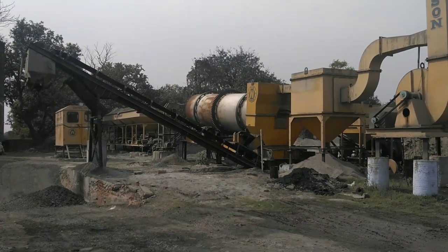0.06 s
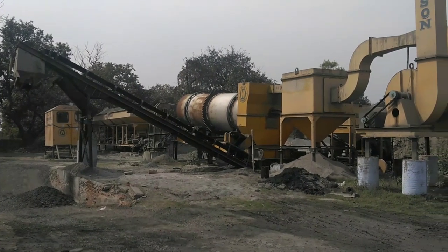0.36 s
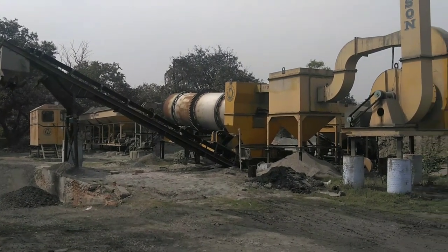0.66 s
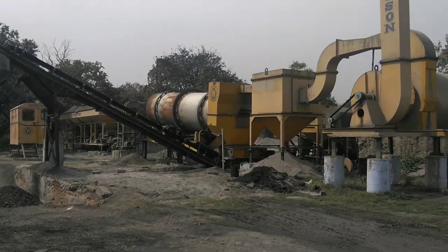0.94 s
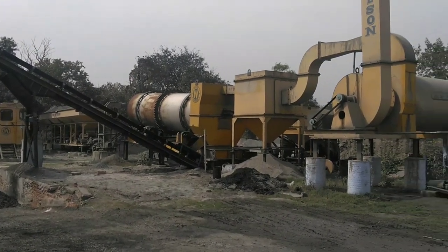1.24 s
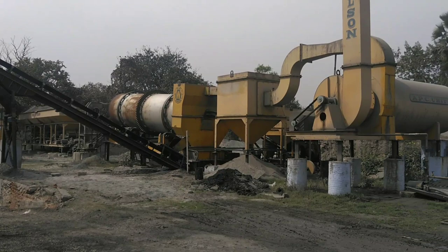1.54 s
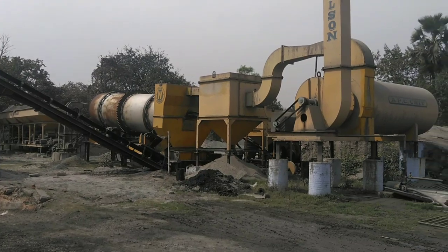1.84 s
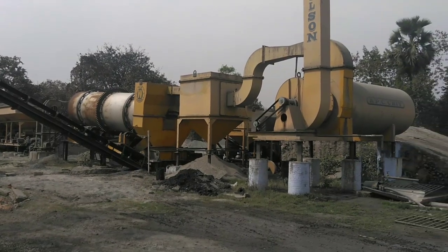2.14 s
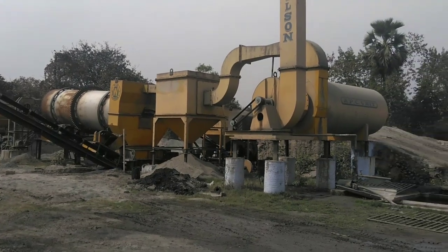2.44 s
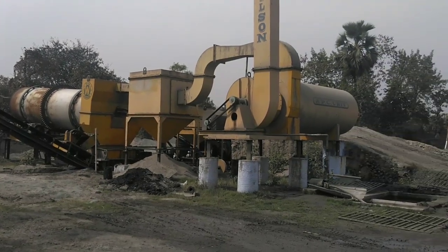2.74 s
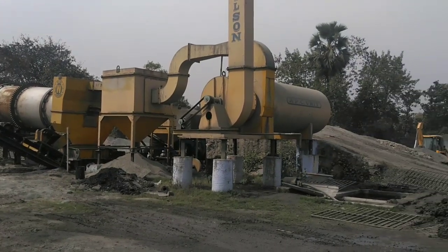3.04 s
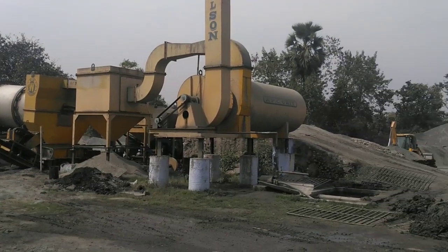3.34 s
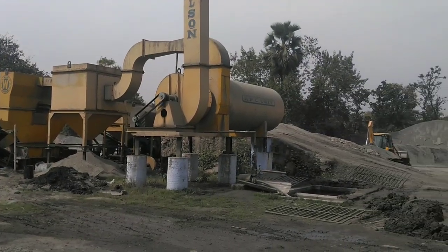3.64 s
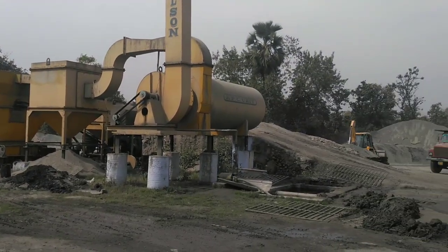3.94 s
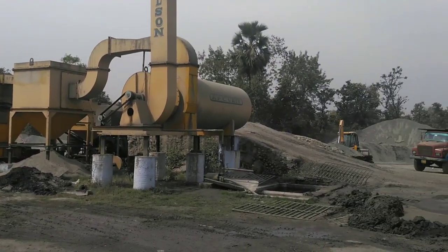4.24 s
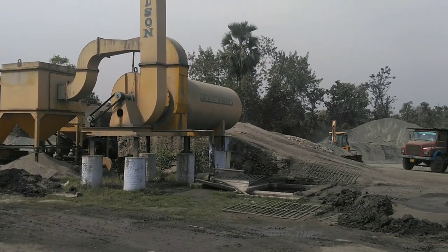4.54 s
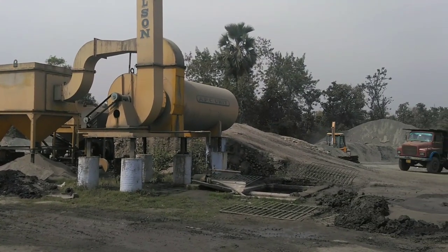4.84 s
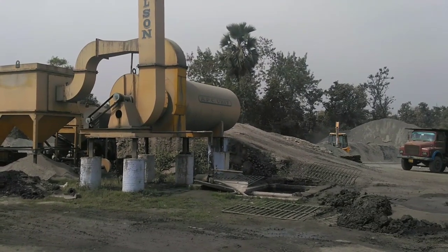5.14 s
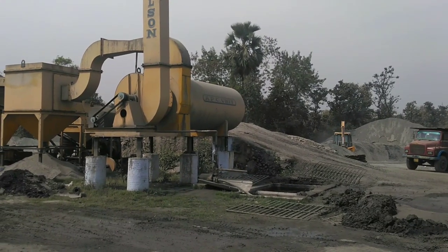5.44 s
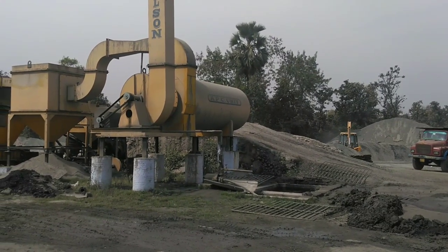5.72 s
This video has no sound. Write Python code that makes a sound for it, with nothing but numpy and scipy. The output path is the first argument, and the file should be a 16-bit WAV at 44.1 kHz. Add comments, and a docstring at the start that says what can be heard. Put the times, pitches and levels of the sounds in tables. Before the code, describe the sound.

A stone crusher works across an open yard, biting about five times a second. Each bite mixes cracking stone, a knock of steel plates and a dull thud. Loose lumps drop and stones snap in between, over a steady rumble and the hiss of sliding grit. A turning part rubs now and then, and a bearing squeaks faintly. The crackle shifts from left to right as the listener turns.

```python
"""A jaw crusher breaks stone, heard across an open yard by a listener who is turning. The jaw closes
about five times a second; each bite is a shower of impacts exciting resonances: cracking stone, a knock
of the plates, a dull thud of the heavy frame. Now and then a lump drops or a stone snaps or splits.
Stick-slip friction makes a turning part rub and sing once a round and a bearing squeak faintly.
Drives, a loaded belt and sliding grit give a steady broadband rumble and hiss."""
import sys
import numpy as np
from scipy import signal
from scipy.fft import rfft, irfft, next_fast_len
from scipy.io import wavfile
from scipy.ndimage import uniform_filter1d

SR = 44100
rng = np.random.default_rng(int(sys.argv[2]) if len(sys.argv) > 2 else 0)


def output_pcm(signal):
    """Save a mono or channel-first signal as 16-bit PCM at the path in sys.argv[1].

    Samples are clipped to [-1, 1] before scaling.
    """
    pcm = np.clip(np.atleast_2d(signal).T, -1, 1) * 32767
    wavfile.write(sys.argv[1], SR, np.round(pcm).astype(np.int16))


N = 254898
TIME = np.arange(N) / SR
SIDES = np.array([[1], [-1]])   # left, right; pan is the left level minus the right

# Levels are relative within each layer; spectra give level per unit bandwidth.
# interaural coherence of the background: f/Hz, coherence (limited to 1 in use)
COHERENCE = [(50, 1.9), (300, 4), (650, 0), (1000, 0.77), (2000, 0.4), (3000, 0), (12000, 0)]
# interaural level difference of the background: f/Hz, pan/dB
BACKGROUND_PAN = [(60, 0), (300, 3), (650, 0), (1100, 4), (1800, -4), (2500, 3.5), (4000, -4), (6000, -2.5),
                  (9000, -9), (13000, -5)]
# phase lead of the left channel added by the microphone's body: f/Hz, phase/rad
DIFFRACTION_PHASE = [(60, -0.29), (300, -0.22), (600, -0.2), (780, -0.23), (1100, -0.098), (1800, 0.35),
                     (2500, -0.36), (3000, 0.17), (4000, 0.17)]
# resonances and antiresonances of the steel housing: f/Hz, bandwidth/Hz, gain/dB
HOUSING_MODES = [(83, 48, -5), (149, 16.5, 5.5), (191, 13, 3.5), (221, 21.3, -12), (266, 16, 4.5),
                 (315, 12, 3), (391, 24, -2), (448, 28, 4.5), (487, 52, -5), (585, 11.3, 5),
                 (693, 122, -3.5), (779, 9.3, 3), (906, 47, 0.5), (1590, 32, 4), (2020, 12, -1.5),
                 (2200, 58, 1.5), (2505, 120, 2.5), (2950, 76, -1)]
# spectrum of the drives: f/Hz, level/dB
DRIVE_SPECTRUM = [(22, -24), (35, -5), (55, 5), (78, 5.5), (150, -0.5), (220, -5.5), (340, -14.5),
                  (520, -19), (680, -18), (900, -13.5), (1500, -15), (2500, -15), (3600, -20.5),
                  (6000, -27.5)]
# rumble of the drives as the listener turns: t/s, level/dB
DRIVE_LEVEL = [(0, -47.5), (.7, -44), (1.25, -45.5), (1.6, -46.5), (2.3, -44), (2.7, -45.5), (3.2, -45.5),
               (3.9, -45.5), (4.8, -49.5), (5.78, -45)]
# spectrum of stone tumbling on the belt: f/Hz, level/dB
BELT_SPECTRUM = [(170, 0), (300, 1.5), (500, -9.5), (700, -4), (1000, -10), (1400, -11.5)]
# noise of the belt's load: t/s, level/dB
BELT_LEVEL = [(0, -58), (1.0, -60), (2.05, -55.5), (2.35, -50), (2.85, -54), (3.3, -52), (3.7, -56.5),
              (4.4, -54.5), (5.05, -53.5), (5.6, -50.5)]
# spectrum of sliding grit: f/Hz, level/dB
GRIT_SPECTRUM = [(1200, -15), (2500, -30), (3300, 6.5), (4100, 0.5), (5000, -1), (6500, -4), (9000, -3.5),
                 (11000, -5), (14000, -4)]
# sliding grit between bites: t/s, level/dB
GRIT_LEVEL = [(0, -59), (.45, -61), (.7, -56.5), (.9, -57.5), (1.25, -58.5), (1.5, -59.5), (2.6, -57),
              (2.92, -59), (3.05, -56.5), (3.85, -55), (4.15, -54.5), (5.2, -57.5), (5.78, -55)]
# grit spilling down the steel: t/s, duration/s, level/dB, f/Hz, bandwidth/Hz, pan/dB
GRIT_SPILLS = [(0.68, 0.14, -57, 5600, 3800, 9), (2.29, .05, -47.5, 2850, 900, 4),
               (3.786, 0.039, -46, 3000, 1100, 0), (3.857, 0.073, -49.5, 3150, 910, -7),
               (4.012, 0.039, -44.5, 2600, 800, -12), (4.215, 0.06, -60, 2880, 1200, 3),
               (4.383, .07, -51.5, 2750, 1400, -4), (5.6, 0.06, -54, 3300, 1100, -3)]
# squeaks of the dry bearing: t/s, duration/s, level/dB, f/Hz, glide/(Hz/s), octave re fundamental/dB
BEARING_SQUEAKS = [(1.58, .13, -73, 4005, 0, -3), (3.2, .2, -68.5, 4005, 0, -5),
                   (4.66, .07, -63.5, 4090, 0, -16), (4.865, .15, -72.5, 4010, 400, 4),
                   (5.01, .17, -67.5, 4112, 100, -1.5)]
# rubs of the turning part, one a round: t/s, duration/s, level/dB, f/Hz, glide/(Hz/s), pan/dB
ROTOR_RUBS = [(0.82, 0.18, -51.5, 1955, 0, 8), (2.49, .11, -50, 1985, 1000, 7),
              (3.92, 0.16, -53, 1965, 0, 4), (5.6, 0.23, -56.5, 1990, 300, 2)]
# loose lumps dropping against the frame: t/s, level/dB, f/Hz
FALLING_LUMPS = [(0.159, -31.5, 134), (0.433, -39.5, 94), (0.489, -40, 327), (0.544, -34, 153),
                 (0.738, -34.5, 273), (0.999, -41, 112), (1.068, -34.5, 184), (1.667, -43, 255),
                 (1.716, -39, 169), (1.796, -44.5, 208), (1.846, -44.5, 205), (2.171, -43.5, 209),
                 (2.219, -29, 189), (2.3, -35.5, 167), (2.342, -29, 204), (2.37, -40.5, 350),
                 (2.434, -36, 282), (2.508, -43.5, 327), (2.529, -41, 177), (2.704, -47, 534),
                 (2.734, -40.5, 119), (3.078, -42.5, 340), (3.115, -31.5, 147), (3.265, -40, 254),
                 (3.299, -31.5, 119), (3.388, -43.5, 420), (3.446, -37, 296.4), (3.657, -36, 177),
                 (3.852, -36.5, 250), (3.998, -37, 309), (4.23, -38, 393), (4.378, -33, 290),
                 (4.465, -26.5, 118), (4.55, -34.5, 120), (4.737, -34.5, 278), (4.771, -35, 120),
                 (4.914, -43.5, 378), (4.985, -39.5, 524), (5.181, -43, 280), (5.31, -33.5, 183),
                 (5.368, -32, 117), (5.671, -29, 129)]
# single stones snapping: t/s, level/dB, f/Hz, pan/dB
STONE_SNAPS = [(.125, -45, 815, -1), (.278, -44, 2720, 18), (0.301, -40, 1130, -4), (.452, -47, 2760, 18),
               (.478, -44, 570, 0), (0.553, -43.5, 1040, 0), (0.651, -37.5, 2600, 22), (.66, -43.5, 900, 3),
               (0.689, -42, 2730, 24), (.728, -40.5, 2590, 16), (.877, -43, 2060, 1), (.97, -43, 2380, 8),
               (1.07, -47, 2450, 13), (1.085, -38.5, 1074, -3), (1.249, -30, 380, -2),
               (1.262, -38.5, 2570, 20), (1.427, -32.5, 2410, 16), (1.622, -40, 1130, 9),
               (1.674, -39.5, 1055, 5), (1.821, -44, 1340, 22), (1.875, -38.5, 2300, 18),
               (2.049, -39, 2300, 16), (2.214, -42, 760, -5), (2.277, -39.5, 1720, -6),
               (2.411, -33.5, 1560, 22), (2.603, -34.5, 1680, 11), (2.983, -45, 1580, 12),
               (2.984, -38, 710, 9), (3.008, -34.5, 926, 3), (3.032, -38, 1790, 2), (3.405, -39, 1390, 2),
               (3.56, -44.5, 1220, 3), (3.601, -38, 390, 22), (3.791, -43, 1490, 3),
               (3.982, -35.5, 616, -3), (3.986, -37.5, 2180, -5), (4.05, -46, 2060, -9),
               (4.162, -41, 1200, -8), (4.35, -28.5, 263, 0.5), (4.359, -37, 795, 17),
               (4.367, -36, 1630, -8), (4.452, -45.5, 1040, 0), (4.545, -40, 1154, 4),
               (4.778, -45, 920, 10), (4.784, -44, 1740, -9), (4.937, -36, 950, 4), (4.969, -40, 1570, -10),
               (5.131, -38, 1260, -3), (5.158, -37.5, 493, -2), (5.352, -33, 940, -2),
               (5.712, -42, 2320, -9), (5.755, -38, 1114, 4)]
# big stones splitting: t/s, level/dB, pan/dB
STONE_SPLITS = [(1.257, -38, -2), (1.47, -34.5, 13), (1.646, -41, 8), (1.879, -45, 12), (2.252, -37, -1),
                (2.622, -35, 4), (3.038, -38, -9), (4.217, -34, -5), (4.229, -31, -6), (4.366, -35.5, -8),
                (4.606, -37.5, -5), (4.787, -37, -5), (4.978, -38, -2), (5.354, -31, -1), (5.392, -32, -5)]
# strokes of the jaw, pitched by the size of the stones caught: t/s, duration/s, rising share,
# thud lag/s, thud duration/s, level/dB of (thud, knock, crunch, crackle), f/Hz of (thud, crunch, crackle)
JAW_BITES = [(0.116, 0.14, 0.53, -0.00072, 0.034, -27, -43, -50, -49, 118, 980, 2440),
             (0.297, 0.084, 0.39, 0.029, 0.055, -33, -46, -48.5, -44.5, 111, 1120, 2620),
             (0.487, 0.11, .24, 0.004, 0.049, -43.5, -39, -47, -48, 136, 835, 2420),
             (0.671, 0.11, .24, 0.05, 0.057, -34.5, -39.5, -43, -42, 164, 1160, 2570),
             (0.88, 0.15, 0.24, 0.025, 0.088, -39, -43.5, -48.5, -45.5, 162, 1010, 2400),
             (1.075, 0.14, 0.26, 0.012, 0.06, -36, -50, -47.5, -48, 139, 1110, 2330),
             (1.261, 0.1, 0.37, 0.0061, 0.083, -35.5, -35, -42, -42.5, 178, 1040, 2400),
             (1.436, 0.086, .2, 0.024, 0.077, -27.5, -36, -43, -40.5, 153, 1040, 2280),
             (1.644, 0.057, 0.33, 0.01, 0.059, -41, -39, -44, -42, 196, 1210, 2430),
             (1.866, 0.1, 0.5, 0.023, 0.041, -35, -51, -41, -41.5, 138, 1230, 2180),
             (2.055, 0.078, 0.47, -0.0083, 0.089, -36, -39.5, -41, -45.5, 171.4, 1220, 2200),
             (2.234, 0.12, 0.25, 0.0046, 0.071, -28, -36.5, -43, -45, 167, 1150, 2110),
             (2.427, 0.084, 0.47, 0.012, 0.1, -39.5, -37, -39, -47, 220, 1390, 2010),
             (2.608, 0.088, 0.27, 0.023, 0.059, -27.5, -44, -39.5, -41.5, 147, 1290, 2350),
             (2.817, 0.068, 0.35, 0.013, 0.064, -51, -38, -44, -50, 184, 1130, 2410),
             (2.996, 0.11, .17, 0.056, 0.073, -41, -40, -42, -44.5, 187, 1090, 2000),
             (3.216, 0.096, .32, 0.053, 0.1, -37, -47, -45.5, -52, 163, 1070, 2330),
             (3.413, 0.1, 0.38, 0.013, 0.05, -42.5, -36.5, -44, -44.5, 201, 1180, 2100),
             (3.616, 0.089, 0.38, 0.0051, 0.068, -34, -31.5, -42, -44, 202, 1080, 2230),
             (3.798, 0.094, 0.32, 0.014, 0.048, -31, -46, -40.5, -40, 207, 1070, 2300),
             (3.986, 0.12, 0.38, 0.04, 0.06, -34, -49, -45.5, -44, 157, 890, 1940),
             (4.175, 0.11, 0.26, 0.0067, 0.052, -22.5, -48, -37, -43.5, 161, 870, 2240),
             (4.364, 0.13, 0.18, 0.031, 0.066, -30.5, -45, -41.5, -47, 142, 1000, 2040),
             (4.587, 0.078, 0.61, -0.017, 0.11, -40, -34.5, -38, -44.5, 157, 1070, 2270),
             (4.769, 0.066, 0.46, -0.0012, 0.1, -35, -33.5, -34, -43.5, 208, 990, 2010),
             (4.963, 0.08, 0.45, -0.015, 0.073, -33.5, -31.5, -40, -46.5, 192, 945, 2220),
             (5.155, 0.093, 0.4, 0.012, 0.037, -32, -35.5, -42, -49.5, 174, 1020, 2160),
             (5.354, 0.076, 0.38, 0.015, 0.078, -37, -28.5, -34.5, -42.5, 168, 1040, 2130),
             (5.537, 0.11, 0.23, 0.023, 0.049, -45, -52, -46.5, -48, 167, 920, 2080),
             (5.727, 0.089, 0.18, 0.033, 0.079, -36, -37.5, -43, -50, 166, 860, 2350)]
# direction of a bite's voices as the listener turns: t/s, pan/dB of (thud, knock, crunch, crackle)
BITE_PANS = [(.1, 3, 7, -1, 19), (.3, -4.5, -2, 0, 11), (1.05, -5.5, 0, 0.5, 16), (1.45, -0.5, 4, 1, 31),
             (1.899, -3, 5, 5, 18), (2.5, 1.5, -3, 4, 2), (3.3, 2, 3, 6, 0), (4.15, 3, 3, 1, -9.5),
             (4.4, -0.5, 3, -4.5, -4.5), (4.9, -2, -4, 1, -7), (5.75, -0.5, -0.5, -1, -7)]
# widening spectrum of the splinters: t/s, bandwidth/Hz
CRACKLE_BANDWIDTH = [(.3, 1060), (2, 1090), (3.2, 1610), (5.7, 1700)]

RISE_SHARE, ATTACK_POWER, RELEASE_POWER = 0.42, 2.36, 1.84   # shape of a swell
WALL_LAG_S = (0.001467, 0.00502)   # range of the round trip to the nearest steel plate
RUB_UPPER_RATIO = 1.09   # upper to lower frequency of the rubbing part


def from_db(db):
    """Amplitude ratio of a level: a factor of ten per 20 dB."""
    return 10 ** (np.asarray(db) / 20)


def rms_one(x):
    """Normalisation to unit mean power."""
    return x / np.sqrt(np.mean(x ** 2) + 1e-20)


def in_time(rows):
    """Linear interpolation of (t/s, value) rows at every sample."""
    return np.interp(TIME, *np.transpose(rows))


def at_hz(rows, hz):
    """Interpolation of (f/Hz, value) rows on a logarithmic frequency axis."""
    freqs, values = np.transpose(rows)
    return np.interp(np.log(hz), np.log(freqs), values)


def drift(corner_hz):
    """Random modulation: low-passed Gaussian noise of unit rms."""
    step, settle = 40, 2000
    pole = np.exp(-2 * np.pi * corner_hz * step / SR)
    white = rng.standard_normal(N // step + settle + 2)
    slow = signal.lfilter([1], [1, -2 * pole, pole * pole], white)[settle:]
    return np.interp(np.arange(N) / step, np.arange(len(slow)), rms_one(slow))


def swell(since, length_s, rise=RISE_SHARE):
    """Transient envelope: a rise to the peak at since = 0, then a decay."""
    rise = np.clip(rise, .1, .9)
    attack = np.abs(since / (rise * length_s)) ** ATTACK_POWER
    release = np.abs(since / ((1 - rise) * length_s)) ** RELEASE_POWER
    return np.exp(-np.where(since < 0, attack, release))


def resonate(x, hz, width_hz, order):
    """Resonance as a band-pass filter whose edges have the geometric mean hz."""
    low = np.sqrt(hz ** 2 + width_hz ** 2 / 4) - width_hz / 2
    edges = [max(low, 10), min(low + width_hz, .45 * SR)]
    return signal.sosfilt(signal.butter(order, edges, "band", fs=SR, output="sos"), x)


def impacts(per_s, spread_db):
    """Poisson process: two independent streams of tiny impacts, many weak and a few strong."""
    struck = rng.random((2, N)) < per_s / SR
    sizes = from_db(spread_db * np.minimum(rng.exponential(1, (2, N)), 3.5))
    return struck * sizes * rng.choice([-1, 1], (2, N)) + 1e-18


def showers(stream, times, lengths_s, levels_db, freqs, widths_hz, pans_db, scatter, steady_s,
            echo=0, rises=RISE_SHARE, lurch_db=0):
    """Impact excitation: swells of impacts ring a resonance; a scattered part differs between the ears."""
    out = np.zeros((2, N))
    lurches = from_db(lurch_db) * np.ones(N)
    events = np.broadcast(times, lengths_s, levels_db, freqs, widths_hz, pans_db, rises)
    for t, length_s, level_db, hz, width_hz, pan_db, rise in events:
        reach = int((length_s + .05) * SR)
        around = np.arange(-reach, reach)
        at = round(t * SR) + around
        envelope, jerks = swell(around / SR, length_s, rise), lurches[at % N]
        force = envelope * jerks / np.sqrt(np.average(jerks ** 2, weights=envelope ** 2))
        # comb filtering: a close reflection, different for every stone, sounds hollow
        stretch = rng.integers(N) + around
        lag = int(rng.uniform(*WALL_LAG_S) * SR)
        excitation = stream[:, stretch % N] + echo * stream[:, (stretch - lag) % N]
        ringing = resonate(excitation, hz, width_hz, order=3)
        # with power evened out over steady_s, force sets the loudness and chance the fine grain
        power = np.abs(uniform_filter1d(ringing ** 2, int(steady_s * SR) + 1, axis=1))
        direct, scattered = force * ringing / np.sqrt(power + np.mean(power) / 10)
        pair = rms_one(direct) + scatter * rms_one(scattered) * SIDES
        pair = rms_one(pair * from_db(SIDES * pan_db / 2))
        inside = (at >= 0) & (at < N)
        out[:, at[inside]] += from_db(level_db) * np.sqrt(np.mean(force ** 2)) * pair[:, inside]
    return out


def banded_noise(spectrum, flicker_db, flicker_hz):
    """Partially coherent stereo noise of unit rms; bands of about a third octave flicker separately."""
    out, edges = 0, np.geomspace(20, 16000, 28)
    white = rng.standard_normal((2, 2, N + SR // 4))
    for k, (low, high) in enumerate(zip(edges, edges[1:])):
        if high < spectrum[0][0] or low > spectrum[-1][0]:
            continue
        hz = np.sqrt(low * high)
        mid, side = resonate(white[k % 2], hz, high - low, order=3)[:, -N:]
        coherence = np.clip(at_hz(COHERENCE, hz), -1, 1)
        band = np.sqrt(1 + coherence) * mid + np.sqrt(1 - coherence) * side * SIDES
        level_db = at_hz(spectrum, hz) + flicker_db * drift(flicker_hz)
        out = out + from_db(level_db + SIDES * at_hz(BACKGROUND_PAN, hz) / 2) * band
    return rms_one(out)


def whistle(t, length_s, level_db, hz, glide, pan_db, tremble_hz, partials_db=(0,), flutter_db=4):
    """Stick-slip oscillation: a thin gliding tone whose frequency wanders by tremble_hz rms."""
    since = TIME - t
    pitch = hz + glide * np.clip(since, -length_s, length_s) + tremble_hz * drift(67)
    phase = 2 * np.pi * np.cumsum(pitch) / SR
    tone = sum(from_db(db) * np.sin(k * phase) for k, db in enumerate(partials_db, 1))
    envelope = from_db(level_db + flutter_db * drift(27)) * swell(since, length_s)
    return envelope * tone * from_db(SIDES * pan_db / 2)


def housing(x):
    """Modal filtering: the steel plates lift some frequencies and swallow others."""
    for hz, width_hz, gain_db in HOUSING_MODES:
        x = x + (from_db(gain_db) - 1) * resonate(x, hz, width_hz, order=1)
    return x


def yard(x, t60_s=0.79, echoes_per_s=900):
    """Reverberation: sparse, decaying reflections off hoppers, tanks and heaps, distinct for each ear."""
    t = TIME[:SR // 2]
    echoes = rng.standard_normal((2, len(t))) * (rng.random((2, len(t))) < echoes_per_s / SR)
    echoes *= from_db(-60 * t / t60_s)
    echoes /= np.sqrt(np.sum(echoes ** 2, axis=1, keepdims=True))
    return signal.fftconvolve(x, echoes, axes=1)[:, :N]


def drives():
    """Broadband machine noise: motors and fan blur into an uneven rumble."""
    return from_db(in_time(DRIVE_LEVEL)) * banded_noise(DRIVE_SPECTRUM, flicker_db=3.0, flicker_hz=6.2)


def belt():
    """Incoherent summation: stones tumbling along the belt merge into a low-mid noise."""
    return from_db(in_time(BELT_LEVEL)) * banded_noise(BELT_SPECTRUM, flicker_db=2.5, flicker_hz=10.3)


def grit(surge_db=2, surge_s=0.11, lag_s=0.0032, waver_db=0.88, top_hz=10730):
    """Granular flow: fine stone hisses off to the right, surges with each bite and sometimes spills."""
    t, _, rise, _, _, _, _, _, crackle_db, *_ = np.transpose(JAW_BITES)
    nearest = np.interp(TIME, t, np.arange(len(t))).round().astype(int)
    vigour = from_db(crackle_db - crackle_db.mean())   # a harder bite shakes more grit loose
    surge = vigour[nearest] * swell(TIME - t[nearest] - lag_s, surge_s, rise[nearest])
    level_db = in_time(GRIT_LEVEL) + surge_db * surge + waver_db * drift(22)
    slide = from_db(level_db) * banded_noise(GRIT_SPECTRUM, flicker_db=1.07, flicker_hz=22.0)
    slide = signal.sosfilt(signal.butter(6, top_hz, fs=SR, output="sos"), slide)
    grains = impacts(per_s=4000, spread_db=1.0)
    return slide + showers(grains, *np.transpose(GRIT_SPILLS), scatter=0.88, steady_s=0.022)


def squeaks():
    """Stick-slip in a dry bearing, off to the right: a fundamental and two harmonic overtones."""
    return sum(whistle(t, length_s, level_db, hz, glide, pan_db=-8, tremble_hz=18,
                       partials_db=(0, octave_db, octave_db - 14))
               for t, length_s, level_db, hz, glide, octave_db in BEARING_SQUEAKS)


def singing(upper_db=-5):
    """Friction-excited vibration: with each rub the metal sings at two close frequencies."""
    return sum(whistle(t, length_s, level_db + db, ratio * hz, glide, pan_db, tremble_hz=30)
               for t, length_s, level_db, hz, glide, pan_db in ROTOR_RUBS
               for ratio, db in ((1, 0), (RUB_UPPER_RATIO, upper_db)))


def scraping(gain_db=3, width_hz=320):
    """Sliding friction: once a round, dense tiny impacts excite the turning part's upper resonance."""
    t, length_s, level_db, hz, _, pan_db = np.transpose(ROTOR_RUBS)
    contacts = impacts(per_s=8100, spread_db=5.0)
    return showers(contacts, t, length_s, level_db + gain_db, RUB_UPPER_RATIO * hz, width_hz, pan_db,
                   scatter=.3, steady_s=0.16)


def lumps(steel, length_s=0.035):
    """Damped impact: a falling lump thuds on the frame; small ones knock higher."""
    t, level_db, hz = np.transpose(FALLING_LUMPS)
    width_hz = 71 + 0.23 * hz
    return showers(steel, t, length_s, level_db, hz, width_hz, pans_db=0.5, scatter=0.29, steady_s=0.0346)


def snaps(stone, length_s=0.032):
    """Brittle fracture: a hard stone gives way in one short, pitched crack."""
    t, level_db, hz, pan_db = np.transpose(STONE_SNAPS)
    width_hz = 84 + 0.17 * hz
    return showers(stone, t, length_s, level_db, hz, width_hz, pan_db,
                   scatter=0.28, steady_s=0.038, rises=0.25)


def splits(stone, length_s=0.013, hz=1280, width_hz=3100, dull_hz=1430):
    """A short pulse has a broad spectrum: a big stone splits with a crack, dulled by distance."""
    t, level_db, pan_db = np.transpose(STONE_SPLITS)
    bursts = showers(stone, t, length_s, level_db, hz, width_hz, pan_db,
                     scatter=0.8, steady_s=0.014, rises=0.17)
    return signal.sosfilt(signal.butter(1, dull_hz, fs=SR, output="sos"), bursts)


def bites(stone, steel, thud_width_hz=122, knock_width_hz=357):
    """Fracture under compression: stone crunches and splinters as the plates knock and the frame thuds."""
    (t, length_s, rise, lag_s, thud_s, thud_db, knock_db, crunch_db, crackle_db,
     thud_hz, crunch_hz, crackle_hz) = np.transpose(JAW_BITES)
    pan_times, *pans = np.transpose(BITE_PANS)
    thud_pan, knock_pan, crunch_pan, crackle_pan = [np.interp(t, pan_times, pan) for pan in pans]
    jerks = drift(40)   # stone gives way in jerks within a bite
    thud = showers(steel, t + lag_s, thud_s, thud_db, thud_hz, thud_width_hz, thud_pan,
                   scatter=0.17, steady_s=0.034)
    knock_hz = 292 * (thud_hz / thud_hz.mean()) ** 0.83   # partly follows the thud's pitch
    knock = showers(steel, t + 0.6 * lag_s, 0.73 * length_s, knock_db, knock_hz, knock_width_hz,
                    knock_pan, scatter=0.33, steady_s=0.095)
    crunch = showers(stone, t, length_s, crunch_db, crunch_hz, widths_hz=crunch_hz, pans_db=crunch_pan,
                     scatter=0.28, steady_s=0.041, echo=0.46, rises=rise, lurch_db=2.16 * jerks)
    crackle_width_hz = np.interp(t, *np.transpose(CRACKLE_BANDWIDTH))
    crackle = showers(stone, t, 1.25 * length_s, crackle_db, crackle_hz, crackle_width_hz, crackle_pan,
                      scatter=0.26, steady_s=0.066, echo=0.74, rises=rise, lurch_db=2.4 * jerks)
    breaking = from_db(2.5) * crunch + from_db(-0.33) * crackle
    frame = from_db(3.0) * thud + from_db(-4.5) * knock
    return breaking, frame


def crusher():
    """Direct and reverberant fields: bright cracking over the thudding frame, both echoing in the yard."""
    stone_hits = housing(impacts(per_s=2000, spread_db=3.0))
    steel_hits = housing(impacts(per_s=1500, spread_db=3.5))
    breaking, frame = bites(stone_hits, steel_hits)
    breaking = breaking + snaps(stone_hits) + splits(stone_hits)
    frame = frame + lumps(steel_hits)
    return breaking + frame + from_db(-15.5) * yard(breaking) + from_db(-27) * yard(frame)


def scene(left_lead_s=0.00022):
    """Path difference and diffraction: the plant stands to the left, so the right port hears it later."""
    left, right = crusher() + housing(drives() + belt()) + scraping()
    size = next_fast_len(N + SR // 10)
    hz = np.maximum(np.fft.rfftfreq(size, 1 / SR), 1)
    phase_lag = 2 * np.pi * hz * left_lead_s + at_hz(DIFFRACTION_PHASE, hz)
    late_right = irfft(rfft(right, size) * np.exp(-1j * phase_lag), size)[:N]
    return np.array([left, late_right]) + singing() + squeaks() + grit()


def record(dry):
    """Band limiting: the microphone's right port passes less deep bass; both channels lose the top."""
    port_hz, cutoff_hz = 54.4, 14200
    right = signal.sosfilt(signal.butter(1, port_hz, "high", fs=SR, output="sos"), dry[1])
    top_cut = signal.ellip(10, .1, 80, cutoff_hz, fs=SR, output="sos")
    return signal.sosfilt(top_cut, np.array([dry[0], right]))


dry = scene()
out = record(dry)
output_pcm(out)
```